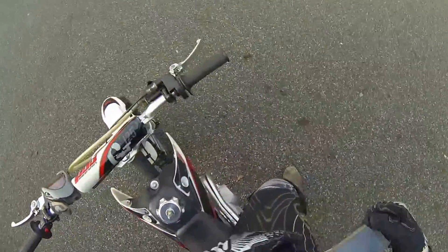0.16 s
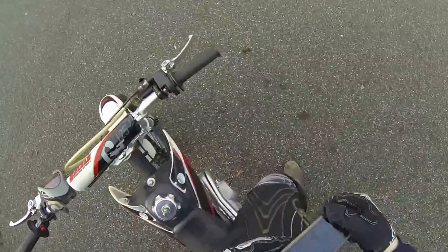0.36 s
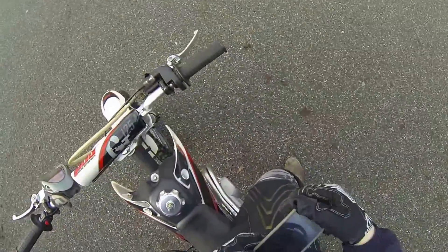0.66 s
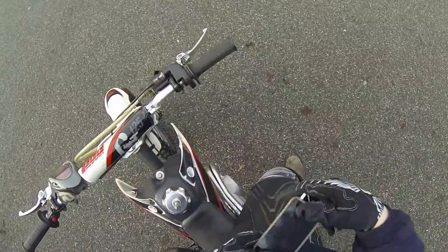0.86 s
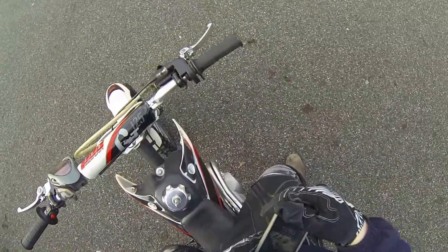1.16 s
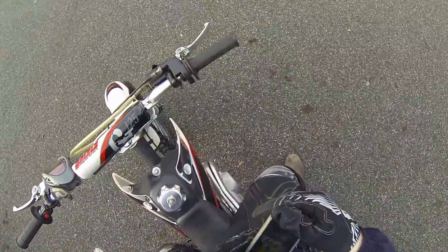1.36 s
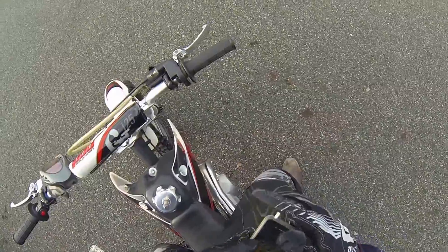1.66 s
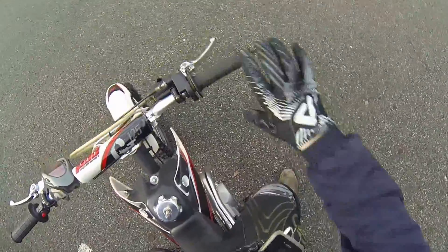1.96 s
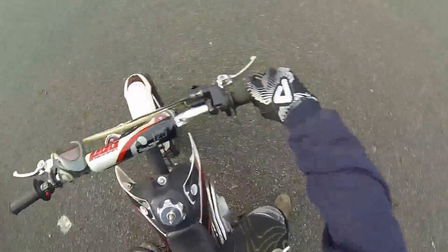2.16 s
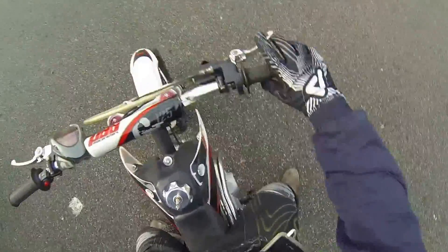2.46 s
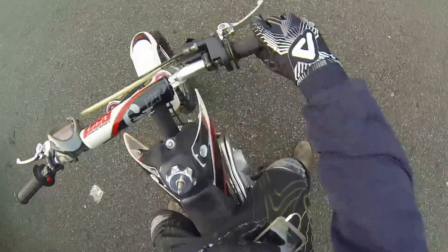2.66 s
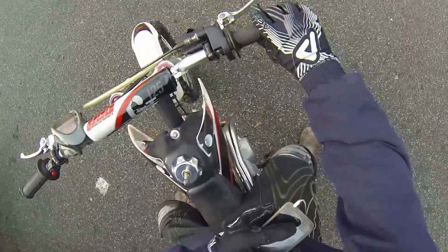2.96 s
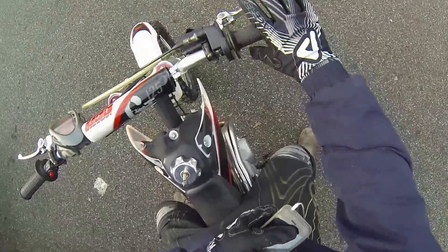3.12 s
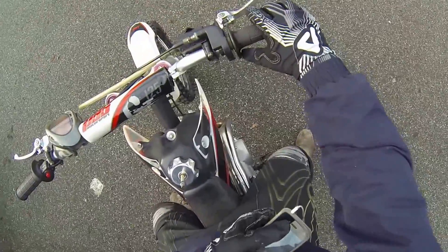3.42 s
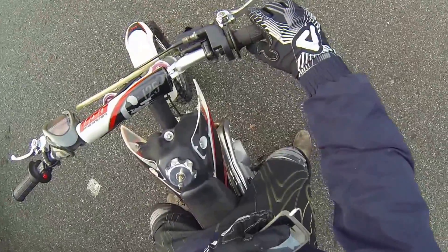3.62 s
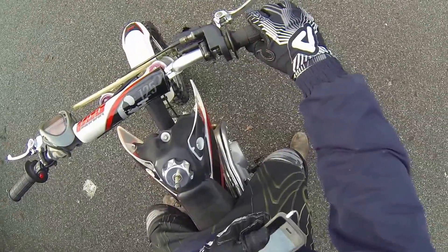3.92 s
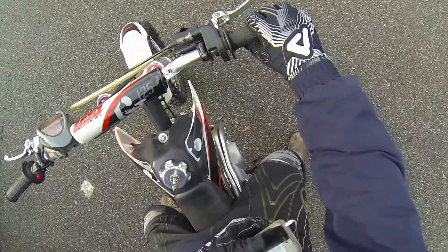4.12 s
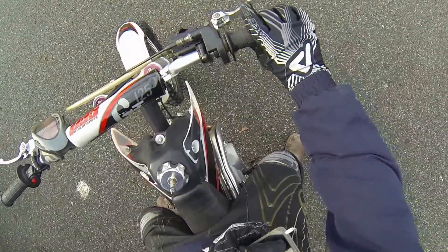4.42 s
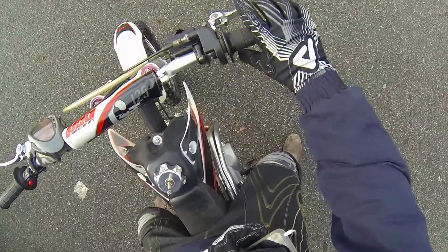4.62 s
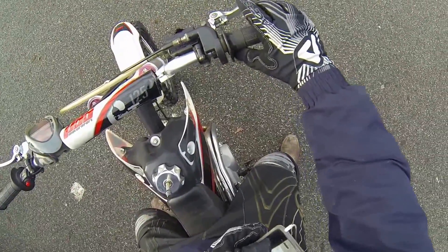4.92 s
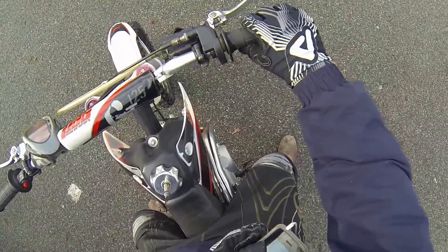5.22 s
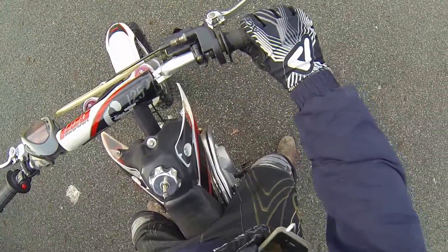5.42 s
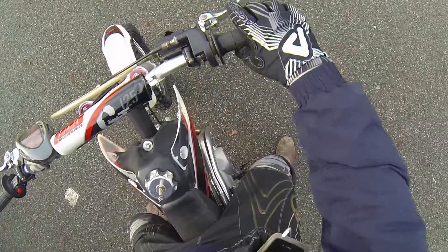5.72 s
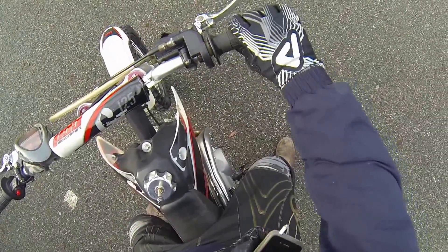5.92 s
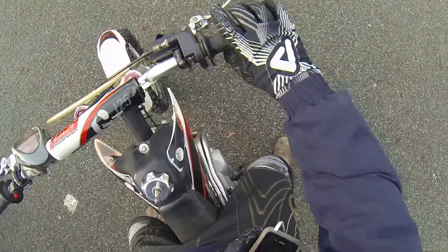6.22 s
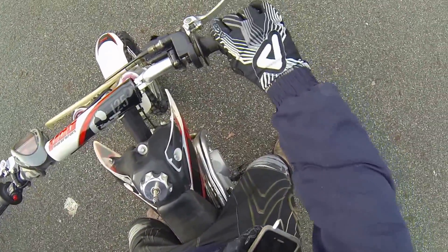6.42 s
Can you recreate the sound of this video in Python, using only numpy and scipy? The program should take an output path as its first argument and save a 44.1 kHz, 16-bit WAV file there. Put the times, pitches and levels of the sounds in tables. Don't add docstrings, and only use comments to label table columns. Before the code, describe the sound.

Heard from the rider's helmet on an open paved lot, a small single-cylinder motorbike idles with uneven soft pops and skipped beats. A gloved hand knocks the grip as a short throttle blip lifts the revs, then another. The engine coasts down between blips with hollow pumping, valve ticks and case rattle. More blips follow, the last the hardest. Faint low rumble lies behind.

```python
import sys
import numpy as np
from scipy import signal
from scipy.fft import rfft, irfft, next_fast_len
from scipy.io import wavfile
from scipy.ndimage import uniform_filter1d, map_coordinates

SR = 44100
rng = np.random.default_rng(int(sys.argv[2]) if len(sys.argv) > 2 else 0)


def to_wav(s):
    ch = np.atleast_2d(s).T
    pcm = np.round(np.clip(ch, -1, 1) * 32767)
    wavfile.write(sys.argv[1], SR, pcm.astype(np.int16))


def level_to_linear(level):
    exponent = np.asarray(level, float) / 20
    return 10 ** exponent


N = 290178

# freq_hz, density_db [dB per Hz]
RUMBLE_SPECTRUM = [(8.8, -22), (15, -51), (102, 4), (152, -18.5), (231, -13), (337, -21), (484, -36.5),
                   (1030, -34), (1140, -36.5), (1400, -24), (1820, -38.5), (3080, -120)]
# freq_hz, level_db [dB rms]
WHINE_TONES = [(10645, -71), (10695, -81.5)]
# start_s, peak_db, pitch_hz, t60_s
KNOCK_EVENTS = [
    (2.216, -40.5, 3240, 0.08),
    (2.258, -44, 1820, 0.072),
    (2.283, -37.5, 3300, 0.049),
    (2.32, -40, 2900, 0.092),
    (2.324, -29.5, 1500, 0.087),
    (4.911, -45, 1430, 0.061),
    (5.418, -43.5, 2950, 0.16),
    (6.532, -30, 3250, 0.041),
]
# cycle_share, level_db, t60_s, dull_weight
VALVE_TICKS = [
    (.02, 7, .013, .1),
    (.04, 1, .05, .2),
    (.34, 3, .012, .5),
    (.35, -2, .045, .9),
    (.38, -4, .09, 1.5),
]
# freq_hz, width_hz, level_db
HEAD_MODES = [(4966, 23, 9.5), (5444, 30, 10), (5740, 5.2, 14.5), (6270, 130, 7.5), (7280, 210, -3.5),
              (8270, 37, 11), (9700, 110, -48), (10020, 53, 7.5), (10400, 97, -12), (10870, 72, 5)]
# freq_hz, density_db [dB per Hz]
HISS_SPECTRUM = [(2470, -8.5), (4200, -1.5), (4520, -7.5), (5330, 5.5), (6850, -5), (8240, -2),
                 (10500, -0.5), (13700, -19), (14900, -45)]
# freq_hz, width_hz, level_db
CASE_MODES = [(565, 44, -12), (1009, 33, -3.5), (1527, 110, 2.5), (1880, 10, 3), (2196, 21, -3),
              (2605, 60, -6), (3065, 130, -4)]
# freq_hz, density_db [dB per Hz]
RATTLE_SPECTRUM = [(250, -16), (420, -9), (627, -11.5), (1030, -2.5), (1140, -8.5), (1530, 8.5),
                   (2020, -1.5), (3650, -15), (4600, -76), (5980, -51), (10100, -120)]
# freq_hz, width_hz, level_db
FIN_MODES = [(3636, 17, 0), (3846, 18, -13), (3976, 20, -11)]
# freq_hz, width_hz
FRAME_MODE = (37.5, 5.9)
# time_s, level_db
SEAT_COUPLING = [(0, 6.5), (.7, 3.5), (1.0, 3.5), (1.6, 2.5), (2.2, -5.5), (2.5, -7), (2.85, 2.5),
                 (3.45, -3), (3.75, 3.5), (4.15, 0.5), (4.4, -3.5), (4.8, -2), (5.3, 1.5), (5.5, 3),
                 (6.05, 1.5), (6.35, -15), (6.55, 14)]
# freq_hz, width_hz, lazy_burn_db, hard_burn_db
BURN_PIPE_MODES = [(78.4, 38, -11, -20), (100.9, 7, -2, -11), (215.7, 24.2, 1.5, -6.5),
                   (278.4, 64, -16.5, -2.5), (336, 26.7, -11.5, -5), (519, 43, -41, -7.5),
                   (797, 72, -28, -28.5)]
# freq_hz, width_hz, level_db, top_revs_extra_db
PUMP_PIPE_MODES = [(70, 12, -24, -2), (104.3, 15.5, 2.5, -1), (206.8, 19.2, -4.5, 5),
                   (276, 25.3, -6.5, -9.5), (347.7, 19.5, -10.5, -2.5), (574, 28, -39.5, 23.5),
                   (765, 42, -35, 19)]
# freq_hz, width_hz, level_db
BARK_MODES = [(515, 71, -2), (783, 98, 0), (1500, 270, 1), (2900, 630, -11)]
# start_s, cycles_since_last_listed_cycle, pop_db
LONE_BURNS = [(0.1438, 1, -21.8), (0.3447, 3, -22.9), (0.4749, 2, -22.4), (0.5395, 1, -25.3),
              (0.6044, 1, -22.4), (0.7917, 3, -21.9), (0.9826, 3, -23.4), (1.1261, 2, -24.3),
              (1.275, 2, -24.0), (1.4231, 2, -24.4), (1.5845, 2, -25.1), (1.7487, 2, -24.1),
              (1.9001, 2, -25.0), (2.0573, 2, -24.2), (2.2093, 2, -32), (2.7353, 9, -32),
              (2.7899, 1, -21.1), (3.4124, 11, -23.8), (3.5041, 2, -19.3), (3.871, 7, -21.8),
              (4.0576, 3, -22.8), (4.6936, 7, -18.0), (4.8183, 3, -17.9), (4.9068, 2, -18.5),
              (5.044, 3, -19.9), (5.1895, 3, -19.9), (5.2957, 2, -26.2), (5.8103, 8, -18.1),
              (6.0711, 1, -21.6), (6.4146, 12, -15.4)]
# first_burn_s, cycles_since_last_listed_cycle, last_burn_s, burn_count,
# hardest_pop_db
THROTTLE_BLIPS = [
    (2.2696, 1, 2.3576, 3, -17.0),
    (2.8863, 2, 2.997, 4, -17.2),
    (4.2479, 3, 4.4359, 5, -18.6),
    (5.3521, 1, 5.5243, 5, -18.3),
    (5.8905, 2, 6.0428, 6, -16.4),
    (6.447, 1, 6.5563, 5, -16.0),
]

FLYWHEEL_GAIN_PER_S2, DRAG_PER_S = 180, .55
OPENING_DB, CLOSING_DB = 3.5, 1
UNLIT_DB = -32
UPRIGHT_S, UPRIGHT_DB = 2.5, 2


def unit(x):
    return x / np.sqrt(np.mean(x ** 2) + 1e-20)


def steady(x, span_s):
    size = int(span_s * SR)
    power = uniform_filter1d(uniform_filter1d(x ** 2, size=size), size=size)
    return x / np.sqrt(np.abs(power) + 1e-12)


def filtered(x, response):
    m = next_fast_len(N + SR // 2)
    return irfft(rfft(x, m) * response(np.fft.rfftfreq(m, 1 / SR)), m)[:N]


def colour(points):
    f, db = np.transpose(points)
    return lambda hz: level_to_linear(np.interp(np.log(hz + 1), np.log(f + 1), db))


def resonances(modes):
    def response(f):
        total = 0
        for k, (hz, width, db) in enumerate(modes):
            total = total + (-1) ** k * level_to_linear(db) * 1j * f * width / (hz * hz - f * f + 1j * f * width)
        return total
    return response


def strikes(times_s, gains, t60_s):
    at = np.clip(np.round(times_s * SR).astype(int), 0, N - 1)
    inside = (times_s > 0) * (times_s < N / SR)
    kicks = np.bincount(at, gains * inside, N)
    return signal.lfilter([1], [1, -level_to_linear(-60 / (t60_s * SR))], kicks)


def grit(per_s, spread_db):
    hits = rng.random(N) < per_s / SR
    return unit(hits * rng.standard_normal(N) * level_to_linear(spread_db * rng.standard_normal(N)))


def background():
    t = np.arange(N) / SR
    whine = sum(level_to_linear(db + 0.5) * np.sin(2 * np.pi * hz * t) for hz, db in WHINE_TONES)
    rumble = unit(filtered(rng.standard_normal(N), colour(RUMBLE_SPECTRUM)))
    return level_to_linear(-41.5) * rumble + whine


def knocks():
    out, t = np.zeros(N + SR), np.arange(SR // 6) / SR
    for start_s, db, hz, t60_s in KNOCK_EVENTS:
        b, a = signal.iirpeak(hz, 9.5, SR)
        ring = unit(signal.lfilter(b, a, rng.standard_normal(len(t))))
        contact = 0.035 * rng.standard_normal(len(t))
        shape = level_to_linear(-60 * t / t60_s) * (1 - np.exp(-t / 0.002))
        out[round(start_s * SR):][:len(t)] += level_to_linear(db) * (ring + contact) * shape
    return out[:N]


def burns():
    rows = list(LONE_BURNS)
    for first_s, before, last_s, n, top_db in THROTTLE_BLIPS:
        k = np.arange(n)
        mean_rate = (n - 1) / (last_s - first_s)
        gaps = (mean_rate ** 2 + FLYWHEEL_GAIN_PER_S2 * (k[1:] - n / 2)) ** -.5
        s = first_s + np.r_[0, np.cumsum(gaps)] * (last_s - first_s) / gaps.sum()
        opening = OPENING_DB * np.clip(1 - k / (n - 2), 0, 1) ** 1.5
        db = top_db - opening - CLOSING_DB * (k == n - 1)
        rows += zip(s, np.r_[before, k[1:] > 0], db)
    rows.sort()
    cycles = [(rows[0][0] - .0677, 1, UNLIT_DB), rows[0]]
    for (start, _, _), (end, n, db) in zip(rows, rows[1:]):
        share = np.arange(1, n) / n * (1 - np.exp(-DRAG_PER_S * (end - start)))
        unlit_s = start - np.log(1 - share) / DRAG_PER_S
        cycles += [(s, 1, UNLIT_DB) for s in unlit_s] + [(end, 1, db)]
    return np.transpose(cycles)


def crank():
    s, steps, _ = burns()
    done = np.cumsum(steps)
    times = np.r_[s[0] - 2 * (s[1] - s[0]), s, s[-1] + 2 * (s[-1] - s[-2])]
    return times, np.r_[done[0] - 2, done, done[-1] + 2]


def effort_db(base_db, speed_power, load_db):
    s, _, pop_db = burns()
    times, done = crank()
    rate = np.interp(np.arange(N) / SR, times, np.gradient(done, times))
    lead_s = .03
    torque = strikes(s - lead_s, level_to_linear(1.1 * (pop_db + 14)), t60_s=0.1)
    load = np.tanh(uniform_filter1d(torque, size=SR // 30))
    return base_db + speed_power * 20 * np.log10(rate / 20) + load_db * load


def valves():
    times, done = crank()
    count = np.arange(done[0], done[-1])
    early_s = .008
    bright, dull = np.full(N, .23), np.full(N, .16)
    for share, db, t60_s, dull_weight in VALVE_TICKS:
        r = rng.standard_normal((len(count), 2))
        at_s = np.interp(count + share + .004 * r[:, 0], done, times) - early_s
        tick = strikes(at_s, level_to_linear(db + 3 * r[:, 1]), t60_s)
        bright, dull = bright + tick, dull + dull_weight * tick

    def below(hz):
        return 1 / (1 + (hz / 6600) ** 12)

    noise = level_to_linear(5) * filtered(dull * rng.standard_normal(N), below)
    noise = noise + filtered(bright * rng.standard_normal(N), lambda hz: 1 - below(hz))
    ringing = unit(filtered(noise, lambda hz: resonances(HEAD_MODES)(hz) * (hz > 4300)))
    hiss = unit(filtered(noise, colour(HISS_SPECTRUM)))
    level_db = effort_db(base_db=-61.5, speed_power=1.35, load_db=2.8)
    return level_to_linear(level_db) * steady(level_to_linear(-5) * ringing + level_to_linear(-2) * hiss, span_s=.2)


def cases():
    s, _, pop_db = burns()
    jolt = 1 + strikes(s + 0.0052, level_to_linear(pop_db + 15.5), t60_s=0.029)
    drive = [(.8 * grit(1200, 3.5) + .6 * rng.standard_normal(N)) * jolt for _ in range(3)]
    ringing = unit(filtered(drive[0], resonances(CASE_MODES)))
    broad = unit(filtered(drive[1], colour(RATTLE_SPECTRUM)))
    rattle_db = effort_db(base_db=-50, speed_power=1.6, load_db=11.4)
    rattle_db = rattle_db - UPRIGHT_DB * (np.arange(N) < UPRIGHT_S * SR)
    rattle = level_to_linear(rattle_db) * steady(level_to_linear(-2.0) * ringing + level_to_linear(-3.0) * broad, span_s=0.48)

    times, done = crank()
    count = np.arange(done[-1])
    seating = 0
    for share in (-.06, .28):
        seating = seating + strikes(np.interp(count + share, done, times), np.ones(len(count)), t60_s=.06)
    fin_drive = (0.28 * drive[2] + rng.standard_normal(N)) * (0.29 + seating)
    fin_db = -56.5 + 1.07 * (np.clip(rattle_db, -58, -46) + 48.5)
    return rattle + level_to_linear(fin_db) * unit(filtered(fin_drive, resonances(FIN_MODES)))


def frame():
    times, done = crank()
    t = np.arange(N) / SR
    turn = uniform_filter1d(np.interp(t, times, done), size=SR // 14)
    rate_hz = uniform_filter1d(np.gradient(turn) * SR, size=SR // 8)
    hz, width_hz = FRAME_MODE
    shake = 0
    for order, db in ((1, 9), (2, 12), (2.5, -4), (3, -2)):
        f = np.maximum(order * rate_hz, 1)
        near = (f / hz) ** 2 / np.hypot(1, (f - hz) / width_hz) ** 2
        shake = shake + level_to_linear(db) * near * np.sin(2 * np.pi * order * turn + 2 * np.pi * rng.random())
    sway_db = 2.5 * map_coordinates(rng.standard_normal(90), [t * 11])
    return level_to_linear(-36 + np.interp(t, *np.transpose(SEAT_COUPLING)) + sway_db) * shake


def puffs(times_s, gains, modes, mode_db, crest_s, heat, uneven_db):
    t = np.arange(SR // 5) / SR
    out = np.zeros(N + len(t))
    scatter = uneven_db * rng.standard_normal((len(times_s), len(modes) + 1))
    hz, width = np.transpose(modes)[:2, :, None]
    decay = np.exp(-np.pi * width * t)
    rise = 1 - np.exp(-(t / .0011) ** 2)
    for s, gain, db, lag, warm, r in zip(times_s, gains, mode_db, crest_s, heat, scatter):
        pitch_hz = hz * (warm + r[0] / 100)
        wave = np.cos(2 * np.pi * pitch_hz * (t - np.reshape(lag, (-1, 1))))
        ring = level_to_linear(db + r[1:])[:, None] * decay * wave
        out[max(round((s - .0017) * SR), 0):][:len(t)] += gain * ring.sum(0) * rise
    return out[:N]


def burn_pops(s, pop_db, lit):
    hard = np.clip((pop_db + 24.5) / 6.5, 0, 1)
    low_hz, _, lazy_db, hard_db = np.transpose(BURN_PIPE_MODES)
    mode_db = lazy_db + hard[:, None] * (hard_db - lazy_db)
    crest_s = (.0039 - .0004 * hard)[:, None] + .001 * (low_hz < 150)
    return puffs(s, lit * level_to_linear(pop_db - .7), BURN_PIPE_MODES, mode_db, crest_s, .99 + .035 * hard, uneven_db=1.5)


def gas_bark(s, pop_db, lit):
    gas = strikes(s + 0.00067, lit * level_to_linear(1.23 * (pop_db + 18.0)), t60_s=0.11) * rng.standard_normal(N)
    return level_to_linear(-26.5) * filtered(gas, resonances(BARK_MODES))


def pumping(s, lit):
    times, done = crank()
    count = np.arange(done[1], done[-1])
    every_s = np.interp(count, done, times)
    unlit = 1 - .9 * np.interp(count, done[1:-1], lit)
    top_revs = np.clip((1 / np.gradient(every_s) - 28) / 8, 0, 1)
    at = np.minimum(every_s * SR, N - 1).astype(int)
    level_db = np.minimum(effort_db(base_db=-37.5, speed_power=1.62, load_db=-7), -32.5)
    suck = unlit * level_to_linear(level_db[at] + 6.0)
    cold_db, extra_db = np.transpose(PUMP_PIPE_MODES)[2:]
    mode_db = cold_db + top_revs[:, None] * extra_db
    heat = 0.8654 + 0.25 * np.tanh(strikes(s, lit, t60_s=1.56)[at] / 3.97)
    trough_s = np.full(len(count), .0016)
    return puffs(every_s, -suck, PUMP_PIPE_MODES, mode_db, trough_s, heat, uneven_db=.4)


def muffler(hz):
    return 1 - 0.81 * np.exp(-(np.log(hz / 480 + 0.0011) / 0.21) ** 2)


def exhaust():
    s, _, pop_db = burns()
    lit = np.clip((pop_db + 29) / 3, 0, 1)
    return filtered(burn_pops(s, pop_db, lit) + pumping(s, lit), muffler) + gas_bark(s, pop_db, lit)


def scene():
    return (background() + knocks() + valves() + cases() + frame() + exhaust())[None]


def band_limit(x):
    return signal.sosfilt(signal.butter(12, 15090, fs=SR, output="sos"), x)


def record(dry):
    mix = dry / (1 + np.abs(dry) ** 4) ** (1 / 4)
    return band_limit(mix)


dry = scene()
out = record(dry)
to_wav(out)
```